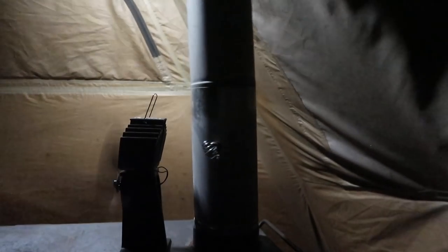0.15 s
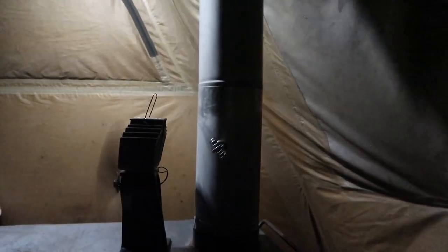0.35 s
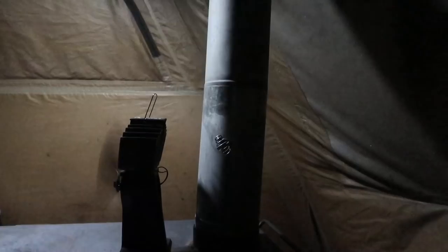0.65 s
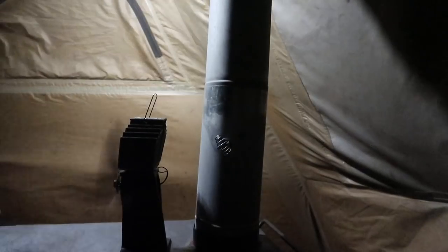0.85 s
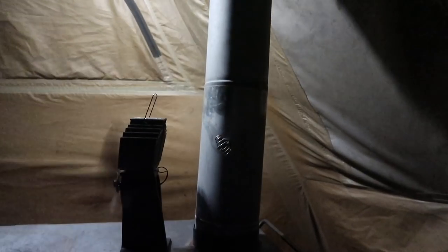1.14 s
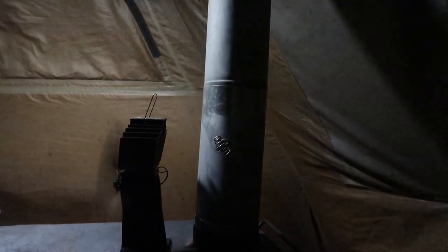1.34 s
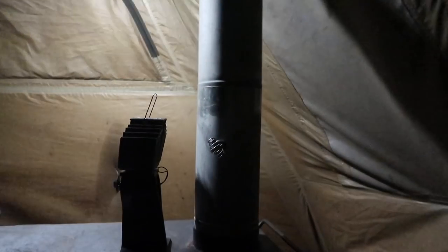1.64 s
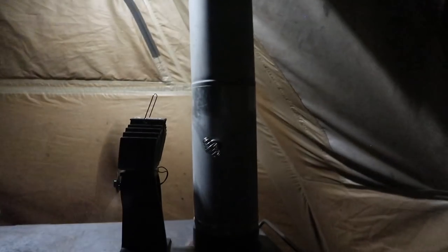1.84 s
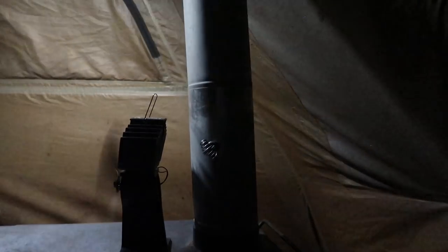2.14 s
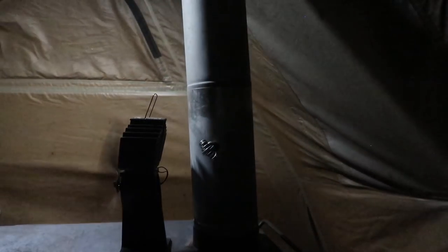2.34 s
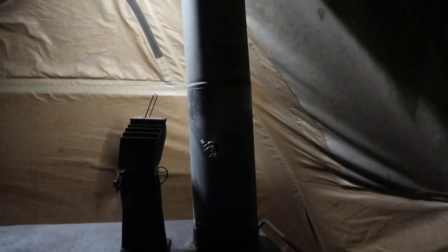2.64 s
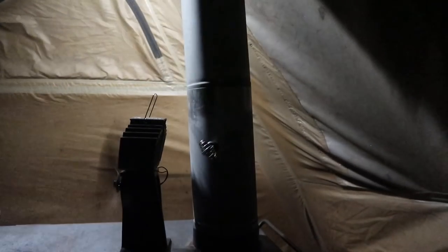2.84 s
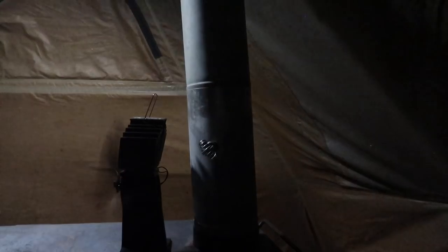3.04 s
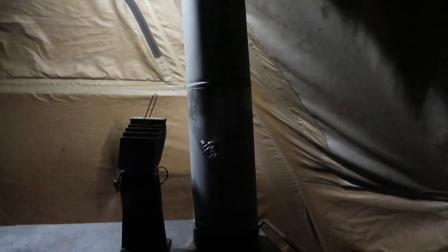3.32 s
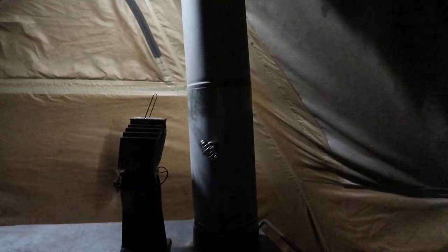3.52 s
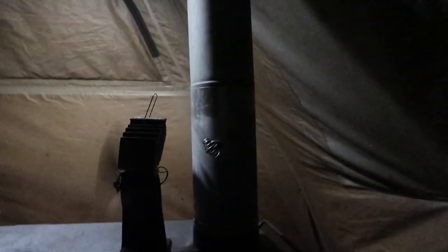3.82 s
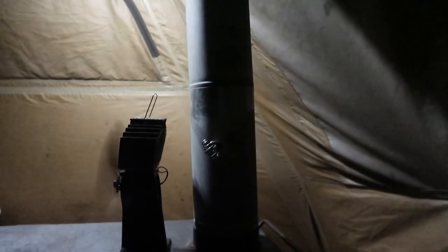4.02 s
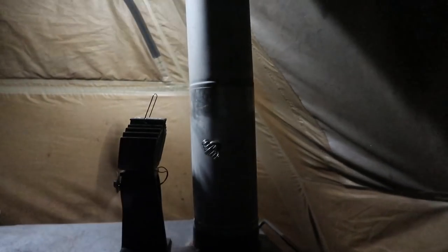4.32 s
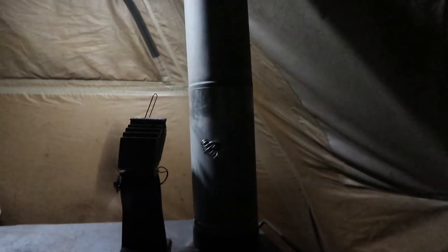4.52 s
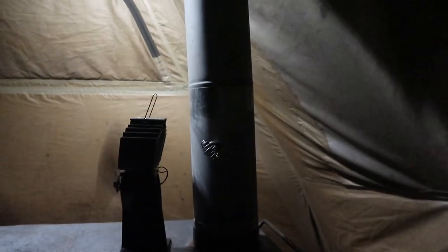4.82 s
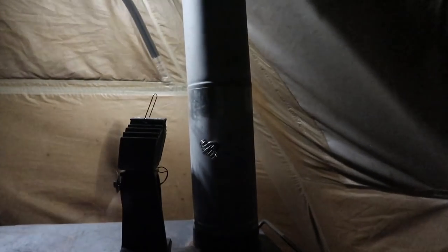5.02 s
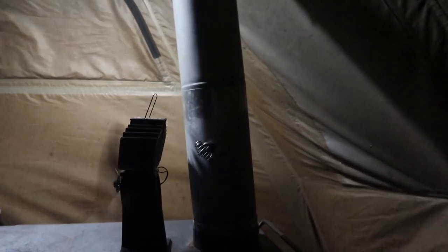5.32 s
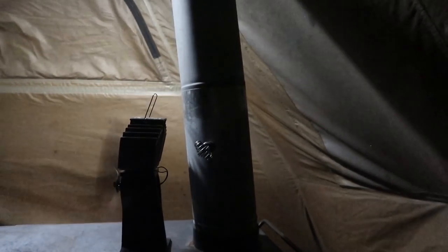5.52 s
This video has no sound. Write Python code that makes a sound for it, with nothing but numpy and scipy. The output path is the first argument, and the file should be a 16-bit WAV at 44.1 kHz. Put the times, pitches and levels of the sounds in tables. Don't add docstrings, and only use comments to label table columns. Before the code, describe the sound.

Inside a canvas tent in a strong winter gale, the walls rumble and drum continuously, strongest in the lows and low mids, with a soft dark rustle above. Early flaps and cracks at 0.1-0.45 s lead to a violent cluster at 0.55-0.7 s: whipping cloth, sharp snaps, deep thumps, and a thin stove pipe knocking and rattling brightly. It eases, with separate slaps near 0.95, 1.1 and 1.35 s and a deep thump at 1.5. Crisp snaps gather from 1.65, peaking around 1.95 with tinny rattle trailing to 2.1. A quieter lull follows, broken by a slap at 2.6. Surges return from 2.85, with slaps near 3.2 and dense blunt flapping at 3.55-3.95, plus a small rattle. A hollow knock and heavy flaps hit around 4.65, then drumming thickens from 4.9 to a loud burst at 5.55-5.6. Close dry stereo, mostly centred, ending abruptly.

```python
import sys
import numpy as np
from scipy import signal
from scipy.io import wavfile

SR = 44100
rng = np.random.default_rng(int(sys.argv[2]) if len(sys.argv) > 2 else 0)


def dump(signal):
    limited = np.clip(np.atleast_2d(signal).T, -1, 1)
    pcm = np.round(limited * 32767).astype(np.int16)
    wavfile.write(sys.argv[1], SR, pcm)


def volts(x):
    e = np.asarray(x, float) / 20
    return 10 ** e


N = 249606

GUST_HZ = [60, 350, 1500, 6000]
RIGHT_LEAN = 0.048
METAL_APART = volts([[0], [-3]])


def rms_one(x):
    return x / np.sqrt(np.mean(x ** 2) + 1e-20)


def at_hz(points, hz):
    point_hz, point_db = np.transpose(points)
    return np.interp(np.log(hz), np.log(point_hz), point_db)


def in_time(rows):
    s, *columns = np.transpose(rows)
    return np.array([np.interp(np.arange(N) / SR, s, column) for column in columns])


def swell(s, half_s):
    return np.exp(-((np.arange(N) / SR - s) / half_s) ** 2)


def drift(rate):
    r = np.exp(-80 * np.pi * rate / SR)
    noise = rng.standard_normal(N // 40 + 2002)
    slow = signal.lfilter([1], [1, -2 * r, r * r], noise)[2000:]
    return np.interp(np.arange(N) / 40, np.arange(len(slow)), rms_one(slow))


def band(x, low_hz, high_hz):
    limits = [low_hz, min(high_hz, .45 * SR)]
    return signal.sosfilt(signal.butter(2, limits, "band", fs=SR, output="sos"), x)


def add(out, s, sound):
    at = round(s * SR)
    out[..., at:at + sound.shape[-1]] += sound[..., :N - at]


def dying(t60, rise_s):
    t = np.arange(SR // 5) / SR
    return volts(-60 * t / max(t60, .004)) * (1 - np.exp(-t / rise_s)), t


def gale():
    # start_s, push_on_walls_db, tautness_db
    wind = [(0.0, 7, -2), (0.28, 6.5, -0.1), (0.5, 0.9, -0.5), (0.58, 8, 6.5), (0.75, -4.5, 4),
            (0.9, -3.5, 0.5), (1.23, -1.5, -5), (1.51, 3.5, 2.3), (1.67, -1.7, -1.5), (1.98, 0.5, 3),
            (2.02, -5.5, 0.5), (2.27, -8.5, -0.2), (2.72, -4.5, -2.5), (3.05, -1.5, -3.5), (3.73, 4, 0),
            (4.26, -2, 4), (5.12, 5.5, -6.5), (5.66, 2, 1)]
    # centre_s, swell_db, half_length_s, pitch_hz
    surges = [(0.179, 8.5, 0.13, 523), (0.663, 0, 0.015, 300.0), (1.09, 4, 0.025, 1770.0),
              (1.158, 6, 0.043, 50.0), (1.324, 7, 0.099, 3220), (1.522, 10, 0.028, 50.0),
              (1.756, 12.5, 0.016, 4020.0), (1.762, 8, 0.11, 260.0), (1.957, 13, 0.067, 850.0),
              (2.06, 11.5, 0.067, 8190.0), (2.859, 9, 0.1, 565), (3.045, 11, 0.079, 450.0),
              (3.143, 5.5, 0.12, 8180.0), (3.235, 11.5, 0.032, 387), (3.39, 7.5, 0.15, 50.0),
              (3.447, 6.5, 0.029, 8190.0), (3.624, 6, 0.12, 140.0), (3.76, 9.5, 0.12, 615),
              (3.968, 7.5, 0.02, 4690.0), (4.024, 8, 0.18, 50.0), (4.032, 6.2, 0.086, 1020.0),
              (4.226, 5, 0.038, 420.0), (4.372, 11.5, 0.13, 60.0), (4.504, 8, 0.1, 980),
              (4.666, 9, 0.079, 148), (4.719, 6.5, 0.065, 1080.0), (4.843, 3, 0.045, 50.0),
              (4.893, 4.5, 0.063, 2240.0), (5.175, 9, 0.099, 380.0), (5.558, 9, 0.17, 470),
              (.35, 2.5, .04, 600), (.86, 3, 0.039, 900), (2.45, 3.5, 0.038, 1200), (3.65, 2, 0.04, 6000),
              (.22, -2.5, .08, 60), (4.47, -2.5, 0.097, 70), (5.18, -2, 0.11, 80), (4.7, -2, 0.17, 2600),
              (1.65, 1, .04, 900), (2.6, 1.5, 0.11, 1800)]
    # centre_s, swell_db, pitch_hz
    flaps = [(.19, 1.5, 500), (.3, -7, 200), (.43, 5, 900), (.6, -7, 150), (1.12, 3, 80), (1.417, 0, 70),
             (1.7, 2, 90), (2.91, 4, 200), (3.113, 2.5, 130), (3.412, 7, 70), (3.66, 5.5, 500),
             (3.732, -5, 500), (3.79, 4, 890), (3.945, 4.5, 500), (4.071, 7, 70), (4.166, 4, 70),
             (4.45, 0, 100), (4.98, -12, 200), (5.21, -2.5, 400), (5.26, 3.5, 400), (5.453, 3, 90),
             (5.51, -5, 500), (5.575, 8, 720), (5.62, 2, 800)]
    # centre_s, swell_db
    puffs = [(.58, 4), (1.09, 5), (1.49, 4), (1.745, 3), (1.955, 6), (2.645, -0.5), (3.06, 1.5), (3.13, 3),
             (3.3, 1), (4.15, 2), (4.3, 0), (3.44, 7), (3.65, 8), (4.73, 6), (5.625, 10)]
    calm_db = [-32.8, -31.5, -32.5, -45.5]
    follows_push = [1.16, 1.004, 1.425, 1.25]
    follows_taut = [-0.65, -0.2, 0.21, 0.9]

    push, taut = in_time(wind)
    gust = np.outer(follows_push, push) + np.outer(follows_taut, taut) + np.array(calm_db)[:, None]
    flap_s, spread_octaves = 0.017, 2.17
    for s, db, half_s, hz in list(surges) + [(s, db, flap_s, hz) for s, db, hz in flaps]:
        octaves_off = np.log2(np.divide(GUST_HZ, hz))
        gust += np.outer(db * np.exp(-(octaves_off / spread_octaves) ** 2), swell(s, half_s))
    swish = 0.69 * gust[3] + 0.2 * gust[1]
    swish += sum(db * swell(s, 0.031) for s, db in puffs)
    return gust, swish


def walls(gust, swish, patchy_db, flutter_db):
    # pitch_hz, level_db (per Hz)
    canvas = [(12, -36), (20, -5), (108, 1), (301, -2.5), (345, -5), (455, -3.5), (584, -6), (814, -8),
              (2200, -18), (3160, -25), (5190, -32.5), (10700, -45), (11600, -46.5), (12900, -62),
              (14900, -75)]
    # pitch_hz, level_db (per Hz)
    port_gap = [(24, -73), (40, -43), (78, -19), (168, -11.5), (442, -3.5), (625, -10), (820, -5.5),
                (1410, -23), (2690, -10), (4760, -11), (6090, -13), (10500, -15), (14900, -25)]

    out = np.zeros((2, N))
    edges = 20 * 2 ** (np.arange(30) / 3)
    white = rng.standard_normal((2, 2, N))
    change = gust - gust.mean(axis=1, keepdims=True)
    swish_change = swish - swish.mean()
    flap, shiver, neighbour = drift(34), drift(32), drift(15.5)
    for k, (low, high) in enumerate(zip(edges, edges[1:])):
        hz, own = np.sqrt(low * high), drift(12.8)
        place = np.interp(np.log(hz), np.log(GUST_HZ), np.arange(4))
        below = min(int(place), 2)
        level_db = change[below] + (place - below) * (change[below + 1] - change[below])
        level_db = level_db * np.interp(hz, [5000, 10000], [1, .7])
        airy = np.clip(np.log2(hz / 1500), 0, 1)
        flicker_db = patchy_db * (own + neighbour) + flutter_db * (flap + 1.33 * shiver)
        flicker_db = (1 - .5 * airy) * min(hz / 120, 1) * flicker_db
        both_db = at_hz(canvas, hz) + level_db
        apart_db = at_hz(port_gap, hz) - 24 + (1 - airy) * level_db + airy * swish_change
        both, apart = volts([both_db, apart_db] + flicker_db) * band(white[k % 2], low, high)
        apart -= RIGHT_LEAN * (250 < hz < 6000) * both
        if 700 < hz < 3200:
            apart *= np.clip(4.2 * drift(8.1) + 0.27, 0, 1.8)
        out += [both, apart]
        neighbour = own
    return out / np.sqrt(np.mean(out[0] ** 2))


def pops(drum_db, per_s, width_hz):
    born = rng.random(N) < per_s * volts(1.5 * drift(8)) / SR
    sizes = volts(1.9 * np.minimum(rng.exponential(1, N), 3.5))
    sizes = sizes * np.where(rng.random(N) < .8, 1, -1)
    pulses = band(born * sizes + 1e-18, 120, width_hz)
    return volts(drum_db) * rms_one(band(pulses, 58, 1800))


def folds():
    # start_s, peak_db
    fold_times = [(3.536, -12), (3.585, -11), (3.617, -8), (3.636, -5), (3.647, -6), (3.671, -9),
                  (3.687, -8), (3.696, -4), (3.705, -11), (3.75, -11), (3.76, -11), (3.774, -5),
                  (3.792, -7), (3.804, -10), (3.83, -11), (3.936, -12), (3.944, -6), (4.031, -12),
                  (4.687, -7), (4.7, -3), (4.709, -11), (4.895, -9), (4.913, -9.5), (5.03, -12),
                  (5.084, -11), (5.092, -9), (5.103, -11), (5.124, -8.5), (5.148, -7), (5.156, -8),
                  (5.172, -7), (5.242, -7), (5.257, -7), (5.301, -8), (5.312, -9), (5.482, -10),
                  (5.538, -8), (5.564, -1), (5.589, -3), (5.616, -3)]
    out = np.zeros(N)
    t = np.arange(-150, 151) / SR
    for (s, db), size in zip(fold_times, rng.uniform(.75, 1.3, len(fold_times))):
        u = t / (0.00031 * size)
        add(out, s - .002, volts(db - 1) * (1 - u ** 2) * np.exp(-u ** 2 / 2))
    return out


def whips():
    # start_s, peak_db, pitch_hz, length_cycles
    whip_hits = [(.547, -10.5, 520, 3.5), (.5615, -12.5, 260, 1), (.5688, -5, 1700, 2.5),
                 (.5695, -23, 6100, 12.0), (0.589, -12, 2200, 2.7), (0.6498, -0.5, 710, 2.6),
                 (1.0788, -13, 1600, 2.4), (1.082, -19, 1100, 5.7), (1.3495, -10, 1055, 3.4),
                 (1.745, -18, 1490, 3.3), (1.8968, -12, 2600, 3.5), (1.925, -25, 5400, 8),
                 (1.925, -19, 3000, 6.0), (1.947, -10, 5500, 11), (1.947, -16, 3070, 6.8),
                 (1.9495, -19.5, 7150, 13), (1.951, -7.5, 1730, 5.7), (1.9524, -10, 620, 3.7),
                 (1.979, -8, 610, 1.4), (1.9685, -5, 620, 5.5), (1.9705, -10, 1100, 7.0),
                 (1.882, -12, 1500, 1.6), (1.6555, -17, 800, 3.0), (2.827, -24, 3000, 2.7),
                 (3.0175, -12, 800, 2.5), (3.186, -13, 2180, 3.5), (3.2205, -6, 800, 1.9),
                 (4.192, -19, 890, 1.8)]
    out = np.zeros(N)
    for s, db, hz, cycles in whip_hits:
        length = cycles / hz * SR
        way = np.arange(int(length)) / length
        shape = np.sin(np.pi * way ** 0.42) ** 0.86
        add(out, s, volts(db) * shape * np.sin(2 * np.pi * cycles * way))
    return out


def struck(rows, cycles):
    out = np.zeros(N)
    for s, db, hz in rows:
        shape, t = dying(cycles / hz, 0.3 / hz)
        rough = rms_one(band(rng.standard_normal(len(t)), 1.14 * hz, 2.3 * hz))
        add(out, s, volts(db) * shape * (np.sin(2 * np.pi * hz * t) + 0.35 * rough))
    return out


def slaps():
    # start_s, peak_db, pitch_hz
    slap_hits = [(1.8825, -11, 1100), (3.2375, -3, 450), (0.95, -11.5, 900), (1.9815, -10, 1400),
                 (1.957, -6, 450), (2.6, -6, 1480), (1.506, -3.5, 196), (4.683, -3, 400), (.953, -12, 630),
                 (1.35, -3, 860), (1.711, -6, 640)]
    return struck(slap_hits, cycles=5)


def thumps():
    # start_s, peak_db, pitch_hz
    thump_hits = [
        (.547, -15, 176),
        (.643, -13, 111),
        (1.162, -17, 105),
        (1.49, -13, 80),
        (2.999, -19, 97),
    ]
    return struck(thump_hits, cycles=11)


def knocks():
    # start_s, peak_db, pitch_hz
    knock_hits = [(.071, -12.5, 400), (.399, -12.5, 454), (.546, -14, 442), (.556, -11, 590),
                  (.624, -13, 440), (.634, -12.5, 597), (.6565, -8.5, 545), (.666, -12, 590),
                  (.952, -20, 584), (1.074, -16.5, 409), (1.35, -11, 990), (1.48, -11, 647),
                  (1.613, -24, 427), (1.655, -17.5, 410), (1.706, -17, 446), (1.742, -24, 511),
                  (1.762, -14.5, 402), (1.788, -16, 500), (1.96, -16, 710), (1.969, -13, 450),
                  (2.861, -17, 395), (3.016, -17, 510), (3.552, -26, 400), (4.35, -20, 423),
                  (4.627, -6.5, 580), (4.888, -17, 314), (5.442, -21, 624), (5.539, -31, 840)]
    return struck(knock_hits, cycles=27.5)


def pipe_ring():
    # pitch_hz, level_db, t60_s
    pipe_tones = [(2867, -0.5, 0.058), (3300, -1, 0.026), (4260, -5.5, 0.052), (4800, -2.5, 0.032),
                  (5600, -6, 0.025), (6200, -4, 0.026), (6300, -50, .03), (6940, -8, 0.041),
                  (7120, -15, 0.063), (7550, -15, .03), (8350, -15, 0.019), (9040, -28, 0.013),
                  (10300, -22, 0.0094)]
    out = 0
    for hz, level_db, t60 in pipe_tones:
        strength, phase = rng.standard_normal((2, 2))
        shape, t = dying(t60, 0.00044)
        uneven = volts(3 * strength[:, None])
        out = out + volts(level_db) * uneven * shape * np.sin(2 * np.pi * hz * t + 3 * phase[:, None])
    return out


def cracks():
    # start_s, peak_db, pipe_rattle_db (against the crack)
    crack_hits = [(.1578, -16, -26), (0.2402, -12.5, -38), (0.4128, -14.5, -26), (0.521, -19, -52),
                  (0.546, -18, -21), (.5685, -13, -14), (0.5905, -13, -20), (.649, -17.5, -18),
                  (0.843, -30, -24), (1.066, -27, -31), (1.0792, -20.5, -23), (1.289, -25, -25),
                  (1.654, -29, -20.5), (1.683, -22, -29), (1.8408, -15.5, -29), (1.8811, -15.5, -38),
                  (1.955, -14, -16.5), (1.9665, -20, -15), (2.278, -30, -34), (3.0155, -26, -28),
                  (3.105, -22, -33), (3.2215, -15, -45), (4.023, -17, -40), (4.1914, -42, -46),
                  (4.551, -20.5, -26), (4.585, -24, -38.5), (5.1388, -19, -43), (5.4511, -18, -42.5),
                  (5.521, -20, -25), (5.5663, -18, -61)]
    # start_s, peak_db, pipe_rattle_db (against the tick), t60_s
    tick_hits = [(.117, -17.5, -44, .03), (0.3475, -27, -29.5, .024), (0.5676, -12, -28, 0.01),
                 (.5905, -14, -27, .012), (.622, -16, -15, .021), (.649, -11, -20, .012),
                 (1.077, -24, -41, 0.026), (1.7442, -16.5, -17, 0.071), (1.851, -27, -28, .02),
                 (1.872, -23, -27, .03), (1.897, -24, -36, 0.017), (1.924, -22, -29, .02),
                 (1.939, -28, -8, .012), (1.9468, -8.5, -13, .026), (2.029, -27, -10, .025),
                 (2.06, -31, -11, .03), (2.827, -21.5, -40, 0.025), (3.149, -23.5, -30, .014),
                 (3.1865, -20, -42, 0.018), (2.086, -29, -18, .03), (3.934, -22.5, -16.5, .03),
                 (4.064, -19.5, -35, 0.029), (4.7283, -17.5, -41, 0.026), (5.629, -21, -40, 0.018),
                 (.5755, -21, -14, .03), (.581, -23, -14, .03), (.598, -21, -16, .025),
                 (.606, -22, -15, .03), (.614, -25, -14, .03), (.631, -24, -16, .03), (.678, -27, -18, .03),
                 (2.0095, -28, -7.5, .03), (2.0145, -31, -12, .03), (2.034, -31, -16, .03),
                 (2.046, -31, -14, .03), (2.07, -30, -16, .03), (2.097, -34, -16, .03)]
    out = np.zeros((2, N))
    crack_hz, crack_t60_s, tick_hz = 1864, 0.053, 2630
    snaps = [(*row, crack_hz, crack_t60_s) for row in crack_hits]
    snaps += [(s, db, rattle_db, tick_hz, t60) for s, db, rattle_db, t60 in tick_hits]
    for s, db, rattle_db, hz, t60 in snaps:
        shape, t = dying(t60, 0.00049)
        jerk = rng.standard_normal((2, len(t))) * (shape + 0.5 * shape ** 4)
        crack = band(jerk, 0.42 * hz, 1.54 * hz)
        crack = band(crack, 0.41 * hz, 1.6 * hz)
        crack = band(crack, 0.31 * hz, 1.65 * hz)
        crack += volts(rattle_db + 1.0) * band(jerk, 3900, 8700)
        add(out, s, volts(db + 2.5) * crack / np.abs(crack[0]).max() * volts([[0], [-18]]))
        add(out, s, volts(db + rattle_db + 3.5) * pipe_ring() * METAL_APART)
    return out


def rattles():
    # start_s, peak_db, loudest_ring_hz
    rattle_hits = [(0.4499, -28, 6930), (0.5581, -22, 6900), (0.568, -22, 6100), (0.59, -19, 6700),
                   (0.6044, -20, 6750), (0.622, -22, 6640), (0.6495, -27, 6750), (0.6774, -35, 7100),
                   (0.6495, -22, 8000), (0.7, -28, 6950), (0.7344, -31, 6400), (1.6126, -25, 5580),
                   (2.0088, -22, 7120), (2.029, -24, 7800), (2.0464, -33, 7100), (2.0602, -28, 7200),
                   (2.0844, -34.5, 7140), (3.9507, -21, 6900), (3.9614, -32, 6900), (3.9714, -29, 7000)]
    out = np.zeros((2, N))
    for s, db, hz in rattle_hits:
        shape, t = dying(0.038, 0.00091)
        pair = np.sin(2 * np.pi * hz * t + rng.uniform(0, 2.3, (2, 1)))
        pair = pair + 0.35 * np.sin(2 * np.pi * (hz + 180) * t)
        add(out, s, volts(db - 6.5) * (shape * pair + volts(-8.5) * pipe_ring()) * METAL_APART)
    return out


def crackle(rustle_db, per_s):
    born = rng.random(N) < per_s * volts(4 * drift(10)) / SR
    sizes = volts(6.2 * np.minimum(rng.exponential(1, N), 3.5)) * rng.standard_normal((2, N))
    clicks = band(born * sizes + 1e-18, 1300, 4600)
    return volts(rustle_db) * rms_one(band(clicks, 1000, 4300))


def scene():
    gust, swish = gale()
    cloth = volts(-20) * walls(gust, swish, patchy_db=1.18, flutter_db=0.91)
    near = cracks() + rattles()
    near += crackle((gust[2] + gust[3]) / 2 - 11, per_s=1000) * volts([[0], [-24]])
    near[0] += knocks() + slaps() + thumps()
    near[0] += pops(gust[1] - 10, per_s=150, width_hz=1080)
    near[0] += whips() + folds()
    near[1] = band(near[1], 3000, 15000)
    near[1] -= RIGHT_LEAN * band(near[0], 420, 1200)
    both, apart = cloth + near
    both = signal.sosfilt(signal.butter(4, 12900, fs=SR, output="sos"), both)
    fade_out = np.minimum(np.arange(N, 0, -1) / 130, 1)
    return np.array([both + apart, both - apart]) * fade_out


def low_pass(x):
    return signal.sosfilt(signal.butter(12, 15300, fs=SR, output="sos"), x)


def record(dry):
    mix = 1.348 * np.tanh(dry / 1.435)
    return low_pass(mix)


dry = scene()
out = record(dry)
dump(out)
```